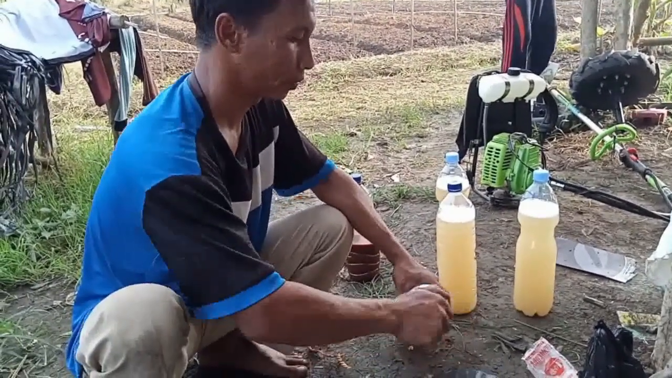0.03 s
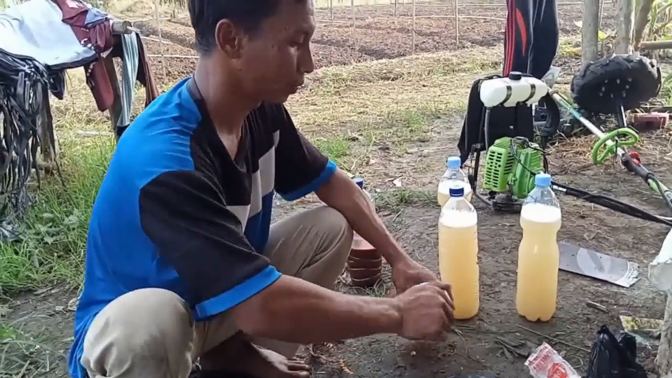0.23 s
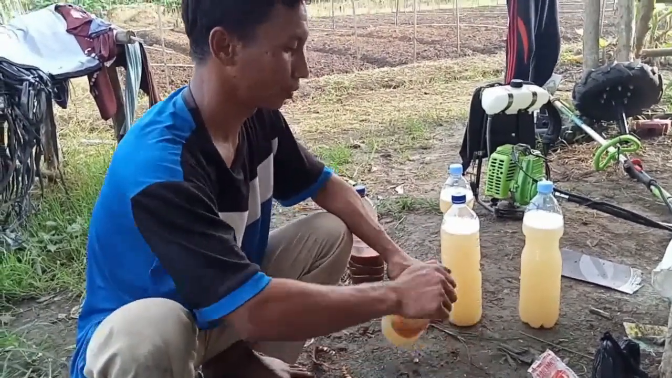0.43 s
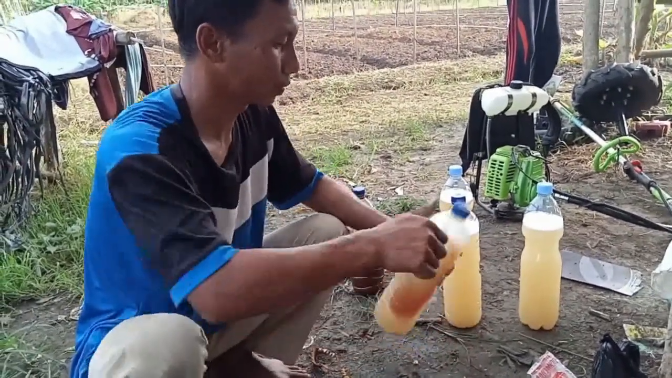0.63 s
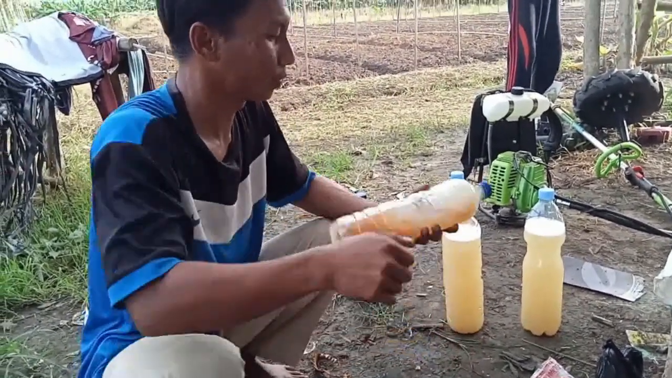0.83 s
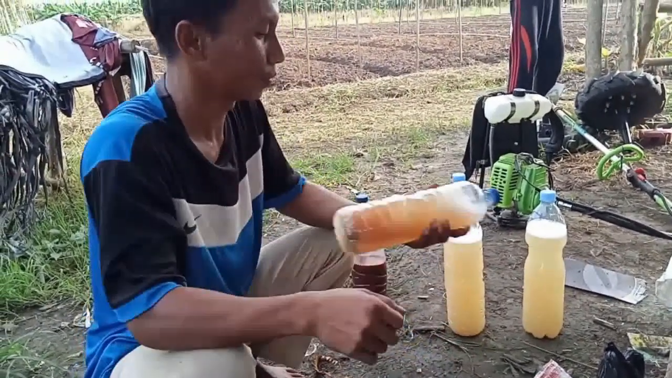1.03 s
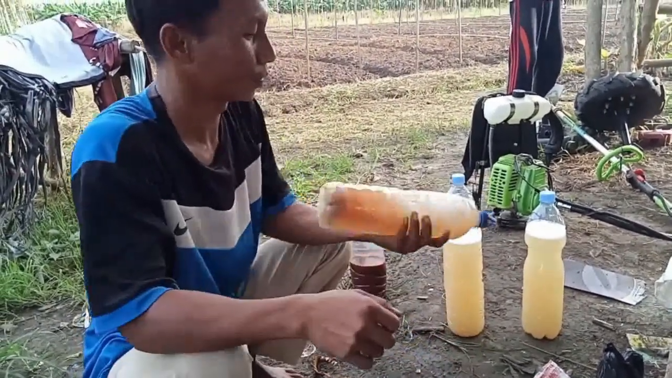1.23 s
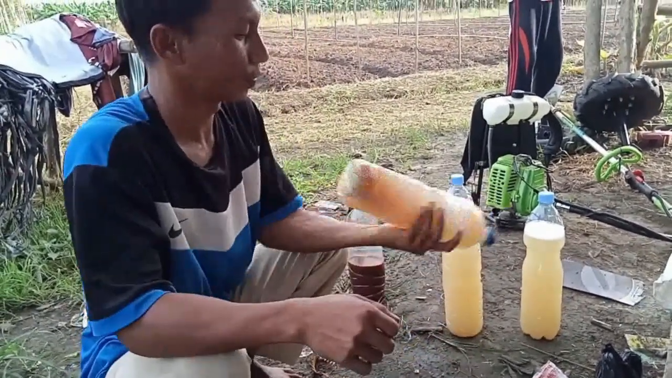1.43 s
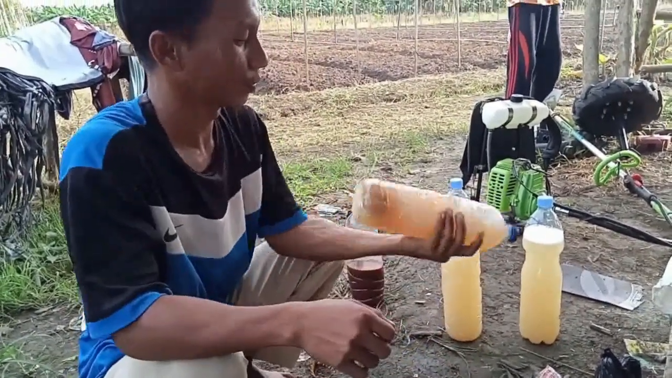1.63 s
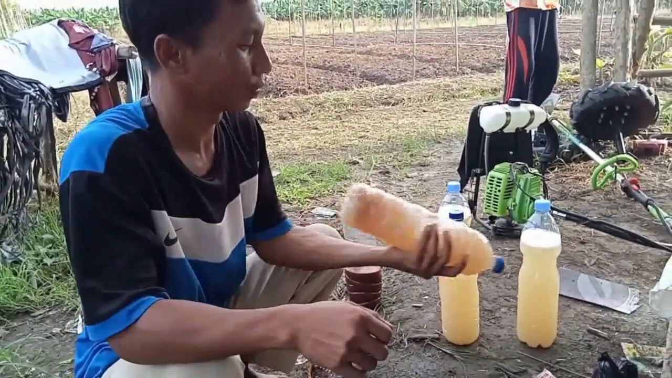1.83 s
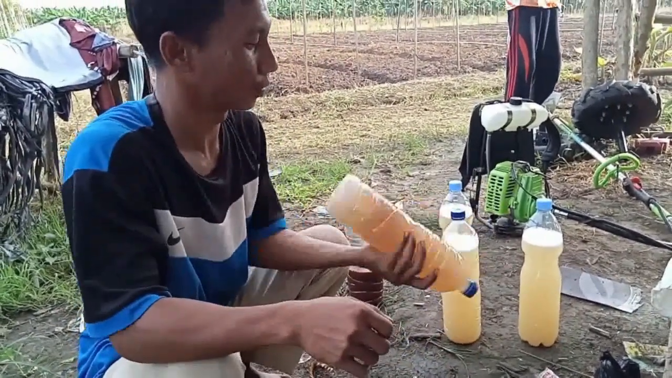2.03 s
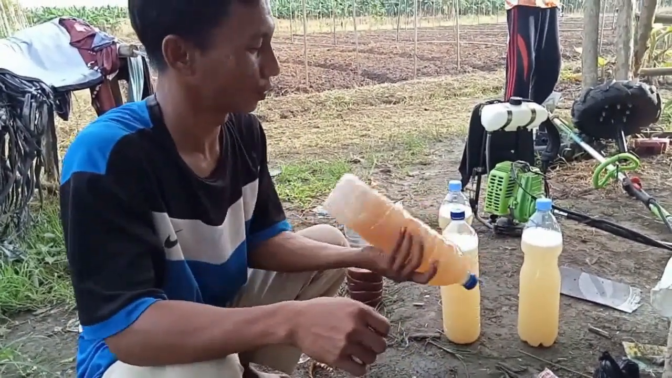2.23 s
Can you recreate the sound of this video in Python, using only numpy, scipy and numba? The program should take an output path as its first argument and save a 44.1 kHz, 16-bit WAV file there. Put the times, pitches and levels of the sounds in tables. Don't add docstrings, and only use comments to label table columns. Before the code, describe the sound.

Liquid sloshing in a shaken plastic bottle, close and dry outdoors. Cap clicks and a tight snap come first, a brief near-quiet follows, then rapid splashing bursts with droplets and glugs over faint insects and a distant engine.

```python
import sys
import numpy as np
from scipy import signal
from scipy.fft import rfft, irfft
from scipy.io import wavfile
from scipy.ndimage import uniform_filter1d
from numba import njit

SR = 44100
rng = np.random.default_rng(int(sys.argv[2]) if len(sys.argv) > 2 else 0)


def transcribe(u):
    v = np.clip(np.atleast_2d(u).T, -1, 1)
    q = np.round(v * 32767).astype(np.int16)
    wavfile.write(sys.argv[1], SR, q)


def voltage_ratio(decibels):
    exponent = np.asarray(decibels, float) / 20
    return 10 ** exponent


N = 99225


def unit(x):
    return x / np.sqrt(np.mean(x ** 2))


def colour(x, outline):
    hz, db = np.array(outline).T
    grid_hz = np.arange(1025) * SR / 2048
    log_gain = np.interp(np.log(grid_hz + 1), np.log(hz), db) * np.log(10) / 20
    cepstrum = irfft(log_gain)
    cepstrum[1:1024] *= 2
    cepstrum[1025:] = 0
    return signal.fftconvolve(x, irfft(np.exp(rfft(cepstrum))))[:N]


def band(x, hz, width_hz):
    b, a = signal.iirpeak(hz, hz / width_hz, SR)
    return signal.lfilter(b, a, signal.lfilter(b, a, x))


def walk(rate_hz):
    hold = int(SR / rate_hz)
    steps = np.repeat(rng.standard_normal(N // hold + 1), hold)
    return unit(uniform_filter1d(steps, hold)[:N])


def fade(t, start_s, decay_s):
    return np.where(t >= start_s, np.exp(-np.clip(t - start_s, 0, None) / decay_s), 0)


@njit
def rings(n, at_s, hz, t60_s, size, glide, rise_s):
    y = np.zeros(n)
    for k in range(len(at_s)):
        start, length = int(at_s[k] * SR), int(t60_s[k] * SR)
        phasor, swell = 1 + 0j, 0.
        turn = np.exp(2j * np.pi * hz[k] / SR - np.log(1000) / (t60_s[k] * SR))
        bend = np.exp(2j * np.pi * hz[k] * glide / SR / length)
        for i in range(start, min(start + length, n)):
            swell += (1 - swell) / (1 + rise_s * SR)
            y[i] += size[k] * swell * phasor.imag
            phasor *= turn
            turn *= bend
    return y


def pockets(rows, cycles, rise_s, glide):
    at_s, db, hz = np.array(rows, float).T.copy()
    return rings(N, at_s, hz, cycles / hz, 2 * voltage_ratio(db), glide, rise_s)


def swarm(rate_hz, low_hz, span, cycles):
    when, pitch, strength, length = rng.random((int(rate_hz * N / SR), 4)).T
    hz = low_hz * span ** pitch
    scatter_db = 2
    size = hz * voltage_ratio(-scatter_db * np.log(strength + 0.018))
    t60_s = cycles * (.5 + 2 * length) / hz
    return unit(rings(N, when * N / SR, hz, t60_s, size, 0.14, 0.00023))


# (start [s], length [s], start level [dB], end level [dB], spray re water [dB])
SURGES = [(0.573, 0.022, -60, -53, -27), (0.579, 0.018, -48, -42.5, -19), (0.593, 0.023, -44.5, -41, -12),
          (0.625, 0.04, -42, -52, -13), (0.67, 0.0097, -49, -50.5, -15), (0.709, 0.027, -43.5, -43, -14),
          (0.741, 0.0078, -44, -44.5, -20), (0.785, 0.05, -46.5, -49.5, -17),
          (0.827, 0.014, -30.5, -40.5, -25), (0.843, 0.073, -42.5, -39, -17.5),
          (0.873, 0.032, -38, -46.5, -11.5), (0.92, 0.072, -49, -52, -14),
          (0.999, 0.017, -50.5, -38, -14.5), (1.021, 0.083, -45.5, -44, -17),
          (1.092, 0.028, -39.5, -43, -15.5), (1.115, 0.022, -49, -37.5, -16.5),
          (1.139, 0.064, -50.5, -49, -14), (1.213, 0.024, -41.5, -39.5, -10.5),
          (1.226, 0.031, -43, -33, -17), (1.258, 0.045, -42, -40.5, -19), (1.314, 0.053, -45.5, -43, -20),
          (1.347, 0.017, -54, -38.5, -19), (1.376, 0.032, -41, -40, -20),
               (1.434, 0.033, -49.5, -43, -15.5), (1.471, 0.023, -42, -37.5, -14),
               (1.505, 0.045, -37.5, -37, -15.5), (1.551, 0.098, -44.5, -44.5, -18),
               (1.671, 0.028, -53, -41, -14.5), (1.698, 0.04, -44, -39, -13.5),
               (1.747, 0.025, -44, -48.5, -14), (1.789, 0.073, -47, -55.5, -12),
               (1.843, 0.032, -49, -44, -13), (1.927, 0.031, -47.5, -35.5, -19),
               (1.967, 0.049, -34, -51.5, -16), (2.061, 0.031, -46, -49.5, -15),
               (2.093, 0.011, -36.5, -38.5, -15.5), (2.099, 0.024, -39, -48, -23),
               (2.175, 0.012, -37, -38, -15.5), (2.186, .07, -41.5, -43, -13.5)]


def surge_power(t):
    attack_s, release_s = 0.0055, 0.012
    trickle_s, trickle_db, air_treble_db = 0.53, -56.5, -77.5
    water_power = voltage_ratio(trickle_db) ** 2 * (t > trickle_s)
    spray_power = voltage_ratio(air_treble_db) ** 2
    for start_s, length_s, from_db, to_db, spray_db in SURGES:
        attack = np.clip((t - start_s) / attack_s, 0, 1)
        release = np.exp(-np.clip(t - start_s - length_s, 0, None) / release_s)
        level_db = np.interp(t, [start_s, start_s + length_s], [from_db, to_db])
        power = (attack * release * voltage_ratio(level_db)) ** 2
        water_power = water_power + power
        spray_power = spray_power + power * voltage_ratio(spray_db) ** 2
    return water_power, spray_power


# (frequency [Hz], level [dB])
FROTH = [(80, -18), (130, 3), (330, -13.5), (750, -3.5), (1050, -7.5), (3300, -3), (4300, -8), (6300, -29)]


def water(bubbles, noise):
    droplets = swarm(500, 600, 8, 40.)
    mix = bubbles + voltage_ratio(-9) * noise + voltage_ratio(-10.5) * droplets
    lowpass = signal.butter(4, 7000, fs=SR, output="sos")
    return signal.sosfilt(lowpass, unit(colour(mix, FROTH)))


# (frequency [Hz], level [dB])
SPRAY = [(4500, -17), (6300, -9), (7600, -5), (8600, 3), (10500, -6), (12200, -11.5), (12700, -22),
         (15700, -28)]


def spray(bubbles, noise):
    return unit(colour(bubbles + voltage_ratio(-0.5) * noise, SPRAY))


# (time [s], level [dB])
SPLATS = [(.398, -59), (0.595, -50), (0.609, -48.5), (.831, -43), (.902, -50), (1.132, -49), (1.286, -46),
          (1.3, -55), (1.402, -53), (1.519, -42.5), (1.534, -43.5), (1.897, -57), (1.942, -48.5),
          (1.968, -43), (2.065, -54), (2.102, -47), (2.210, -55)]


def splat_power(t):
    return sum((voltage_ratio(db) * fade(t, at_s, 0.0055)) ** 2 for at_s, db in SPLATS)


def froth(t):
    bubbles = swarm(13000, 200, 75, 14.)
    noise = rng.standard_normal(N)
    water_power, spray_power = surge_power(t)
    linger_s = 0.0089
    keep = np.exp(-1 / (linger_s * SR))
    lingering = signal.lfilter([1 - keep], [1, -keep], spray_power)
    spray_power = .5 * spray_power + .5 * lingering + splat_power(t)
    return np.sqrt(water_power) * water(bubbles, noise) + np.sqrt(spray_power) * spray(bubbles, noise)


# (time [s], level [dB], frequency [Hz])
GLUGS = [(0.61, -36, 756), (0.861, -39, 800), (0.884, -32, 700), (0.899, -45, 705), (0.957, -41.5, 745),
         (1.009, -33, 736), (1.057, -27.5, 770), (1.081, -31.5, 710), (1.217, -33.5, 770),
         (1.19, -43.5, 410), (1.255, -43, 630), (1.348, -28, 1240), (1.356, -27, 1145), (1.484, -35, 780),
         (1.515, -41, 387), (1.534, -34, 465), (1.614, -36.5, 790), (1.704, -37, 880), (1.944, -29, 762),
         (1.969, -30.5, 572), (1.989, -38, 657), (2.102, -33.5, 648), (2.186, -34.5, 682),
         (2.225, -40, 523), (2.236, -40, 500)]


def glugs():
    return pockets(GLUGS, cycles=18.4, rise_s=0.0014, glide=0.11)


# (time [s], level [dB], frequency [Hz])
THUDS = [(0.055, -49, 225), (0.176, -38, 222), (0.247, -29.5, 209), (0.712, -36, 245), (0.724, -39, 183),
         (.752, -46, 181), (0.847, -43.5, 119), (1.048, -45.5, 111), (1.172, -45, 133), (1.218, -44.5, 128),
         (1.494, -35, 196), (1.598, -43.5, 182), (1.946, -36.5, 189.6), (2.069, -44, 186),
         (2.093, -44, 163.4), (2.189, -41, 201), (2.229, -39, 227)]


def thuds():
    return pockets(THUDS, cycles=9.94, rise_s=0.0059, glide=-0.25)


# (time [s], level [dB], frequency [Hz])
DROPS = [(0.6239, -32, 3040), (0.6431, -30.5, 3100), (0.679, -35.5, 3380), (0.7286, -38, 2930),
         (0.7461, -33, 2820), (0.8312, -35, 4900), (0.8351, -27, 3130), (0.8559, -38, 4130),
         (0.8626, -35, 2940), (0.8668, -35, 1760), (0.8815, -36, 3050), (0.893, -32, 1940),
         (0.917, -28, 3400), (1.0135, -35, 2870), (1.0142, -48, 1820), (1.0606, -45, 1160),
         (1.1327, -30, 2600), (1.2173, -41, 2570), (1.2198, -31, 4010), (1.236, -41, 3320),
         (1.2422, -49, 2370), (1.2512, -40, 2820), (1.3013, -28, 4230), (1.3637, -47, 3800),
         (1.3856, -36, 2540), (1.3961, -44, 3540), (1.4014, -40, 3380), (1.4405, -43, 1600),
         (1.4515, -41, 1900), (1.4812, -32, 1970), (1.4902, -37, 3880), (1.4937, -35, 2630),
         (1.5178, -36, 3100), (1.5333, -30, 3650), (1.5405, -34, 2000), (1.548, -41, 3000),
         (1.5912, -36, 2630), (1.6929, -35, 1830), (1.6987, -30, 3030), (1.7052, -42.5, 1140),
         (1.7186, -39, 1830), (1.7281, -34, 1880), (1.7349, -43, 2070), (1.8768, -36.5, 1860),
         (1.9436, -42.5, 1130), (1.9456, -31.5, 3220), (1.9671, -40, 1120), (1.9688, -25, 2950),
         (1.983, -32, 3160), (2.0205, -41, 1800), (2.0646, -39, 2550), (2.099, -33, 2540),
         (2.1202, -43, 3570), (2.1831, -34, 1970), (2.1883, -35.5, 1117)]


def drops():
    return voltage_ratio(-2) * pockets(DROPS, cycles=29.7, rise_s=0.00053, glide=.05)


# (time [s], level [dB], frequency [Hz])
CRACKLES = [
    (.5953, -19.5, 3870),
    (.5955, -33, 1800),
    (.597, -30, 3300),
    (.608, -29, 2950),
    (.677, -38, 2310),
    (.905, -32, 1565),
    (1.553, -30, 3180),
]


def crackles():
    return pockets(CRACKLES, cycles=25, rise_s=0.00022, glide=0.)


def strike(modes, at_s, db, again_s, again_db):
    hz, mode_db, t60_s = np.array(modes, float).T.copy()
    sense = np.where(hz > 787.5, -1, (-1.) ** np.arange(len(hz)))

    def blow(when_s, blow_db):
        size = sense * voltage_ratio(mode_db + blow_db) / 3
        return rings(N, when_s + 0 * hz, hz, t60_s, size, 0., .00015)

    return blow(at_s, db) + blow(at_s + again_s, db + again_db)


def dull(x):
    return signal.sosfilt(signal.butter(4, [137, 4200], "band", fs=SR, output="sos"), x)


# (frequency [Hz], level [dB], t60 [s])
CAP = [(230, -19, 0.061), (565, -7.5, 0.034), (650, 0.5, 0.023), (905, -9, 0.01), (1105, 2, 0.032),
       (1253, -10, 0.037), (1553, 1.5, 0.02), (1819, 5, 0.018), (2220, -2.5, 0.038), (2820, 5.5, 0.026),
       (3260, -3.5, 0.025), (3570, 7.5, 0.024), (3650, -11, 0.014), (4330, -9.5, 0.06)]
# (frequency [Hz], level [dB])
SNAP = [(100, -47), (450, -20), (800, 4.5), (3700, -6.5), (4600, -19), (6300, -35), (8300, -27),
        (14000, -59)]


def cap_snap(t):
    snap_s = .2082
    blows = strike(CAP, snap_s, db=-8.5, again_s=0.00124, again_db=-9.5)
    tail = voltage_ratio(-23.5) * fade(t, snap_s, 0.0092) + voltage_ratio(-36) * fade(t, snap_s, 0.037)
    return dull(blows) + 3 * colour(tail * rng.standard_normal(N), SNAP)


# (frequency [Hz], level [dB], t60 [s])
BODY = [(219.7, 2.5, .12), (397, 0, 0.055), (667, 6, 0.073), (845, 1, 0.078), (1275, 2, 0.021),
        (1815, 1, 0.025)]


def body_knock(t):
    knock_s = .2422
    blows = strike(BODY, knock_s, db=-25, again_s=0.0079, again_db=-5.5)
    noise = unit(band(rng.standard_normal(N), 540, 870))
    return dull(blows + voltage_ratio(-31) * fade(t, knock_s, 0.014) * noise)


# (time [s], level [dB], decay [s], frequency [Hz])
TICKS = [(0.0583, -42, 0.01, 810), (0.056, -48, 0.013, 2840), (0.055, -45, 0.0094, 1330),
         (0.175, -53, 0.0034, 2500), (0.2057, -41, 0.0068, 2520), (0.3966, -46, 0.0069, 1984),
         (0.3984, -45, 0.0032, 4200), (0.406, -46.5, 0.012, 2270), (0.431, -44, 0.0043, 2140),
         (0.507, -48.5, 0.0073, 2640), (0.198, -46, 0.0067, 600), (0.4, -57, 0.086, 230)]


def ticks(t):
    noise = rng.standard_normal(N)
    total = np.zeros(N)
    for at_s, db, decay_s, hz in TICKS:
        total += voltage_ratio(db) * fade(t, at_s, decay_s) * unit(band(noise, hz, hz * .55))
    return dull(total)


# (frequency [Hz], level [dB])
FIELD = [(30, -11), (110, 1.5), (700, -7), (3500, -12), (4300, -17.5), (6100, -45), (9000, -18.5),
         (15500, -61)]


def air():
    return voltage_ratio(-62.5 + .5 * walk(23.5)) * unit(colour(rng.standard_normal(N), FIELD))


# (frequency [Hz], width [Hz], level [dB])
DRONES = [
    (8210, 550, -68.5),
    (108.2, 25, -63.5),
    (242.6, 30, -72),
    (60, 17, -78.5),
]


def insects_and_engine():
    total = np.zeros(N)
    for hz, width_hz, db in DRONES:
        level = voltage_ratio(db + walk(hz ** .5))
        total += level * unit(band(rng.standard_normal(N), hz, width_hz))
    return total


def scene():
    t = np.arange(N) / SR
    liquid = froth(t) + glugs() + thuds() + drops() + crackles()
    bottle = cap_snap(t) + body_knock(t) + ticks(t)
    field = air() + insects_and_engine()
    return (liquid + bottle + field)[None]


def low_pass(x):
    return signal.sosfilt(signal.butter(12, 15680, fs=SR, output="sos"), x)


def record(dry):
    return low_pass(dry)


dry = scene()
out = record(dry)
transcribe(out)
```